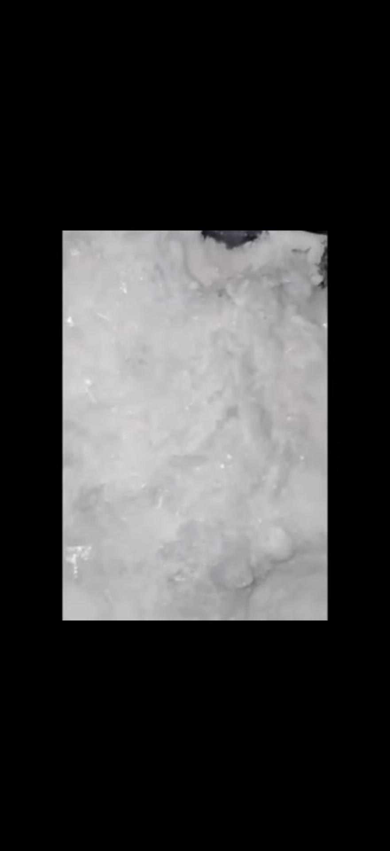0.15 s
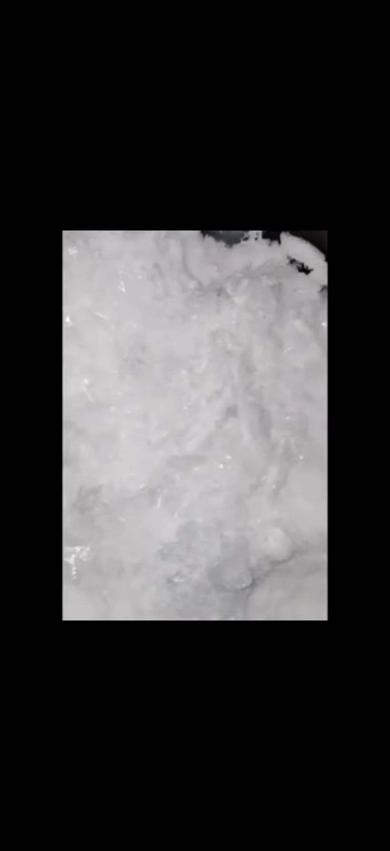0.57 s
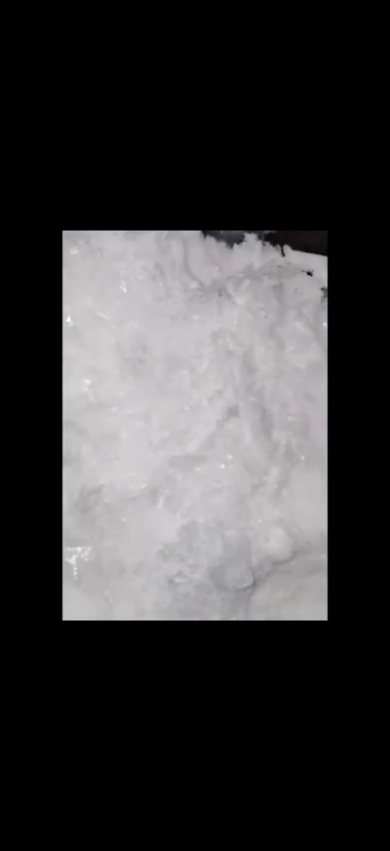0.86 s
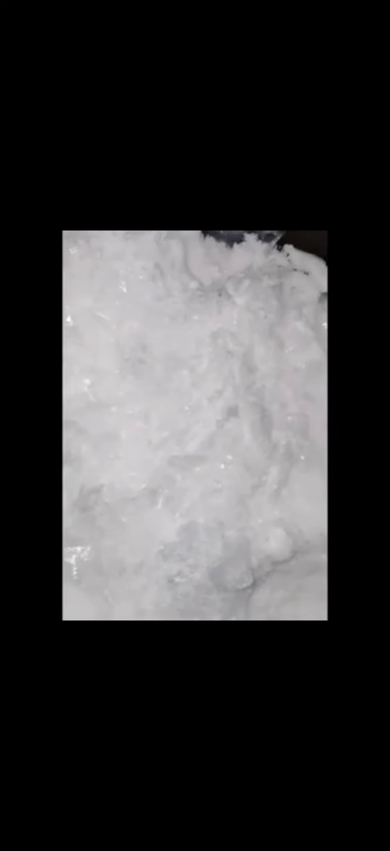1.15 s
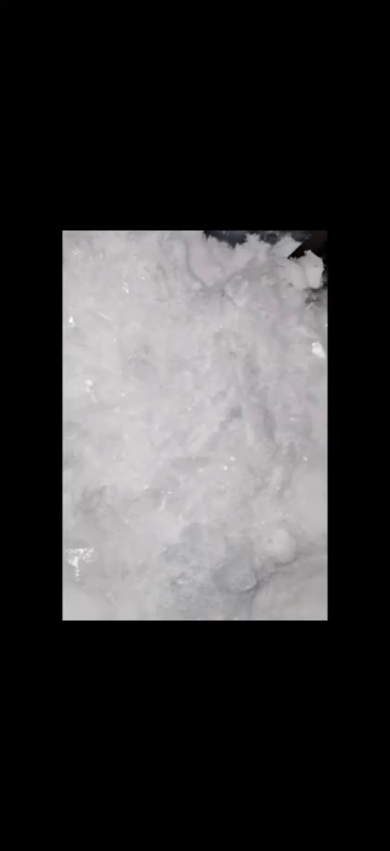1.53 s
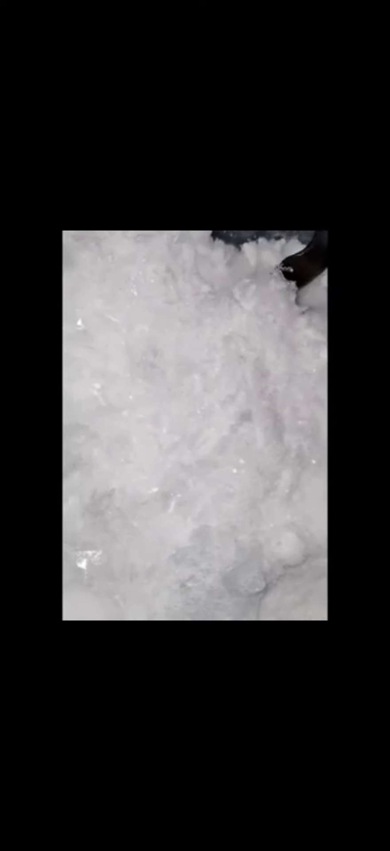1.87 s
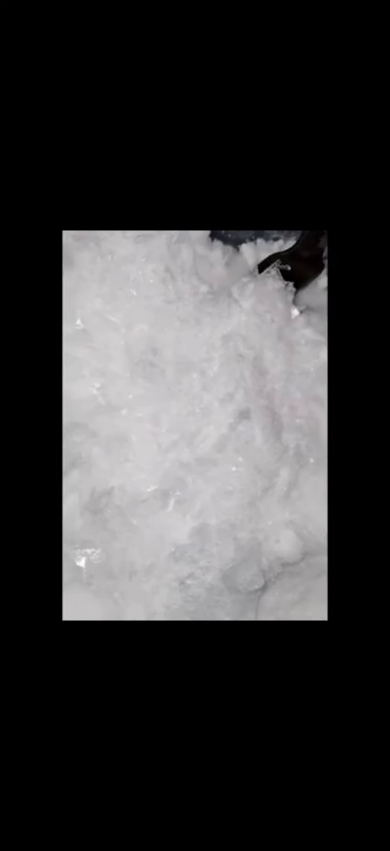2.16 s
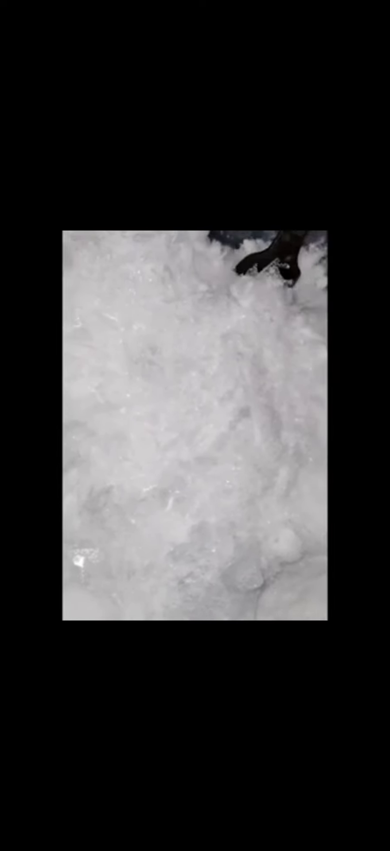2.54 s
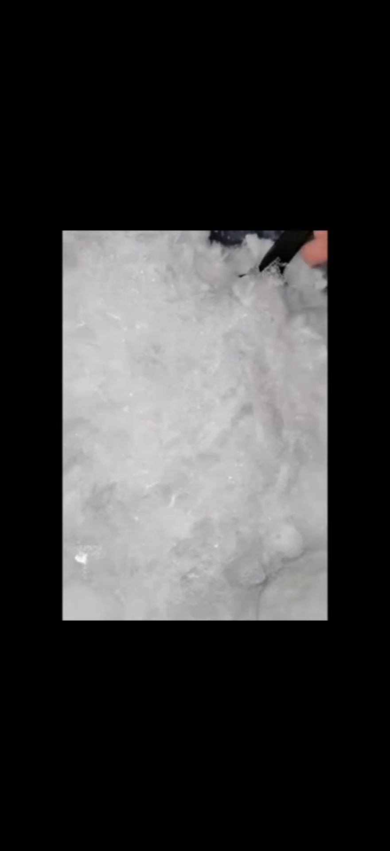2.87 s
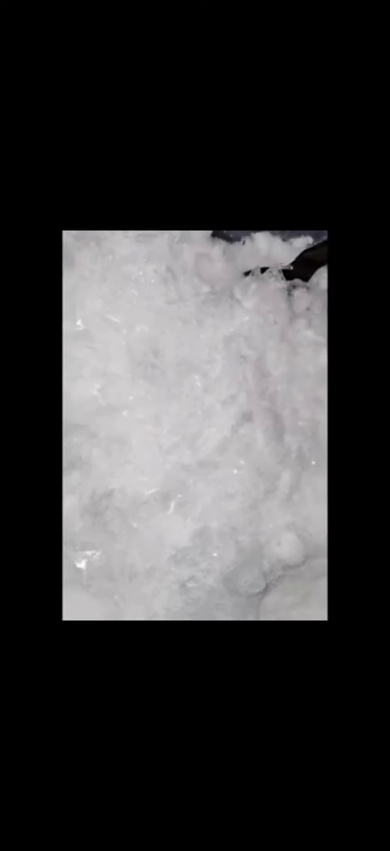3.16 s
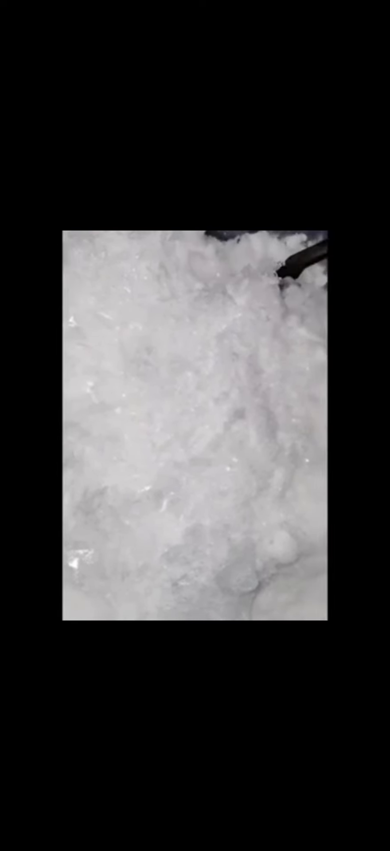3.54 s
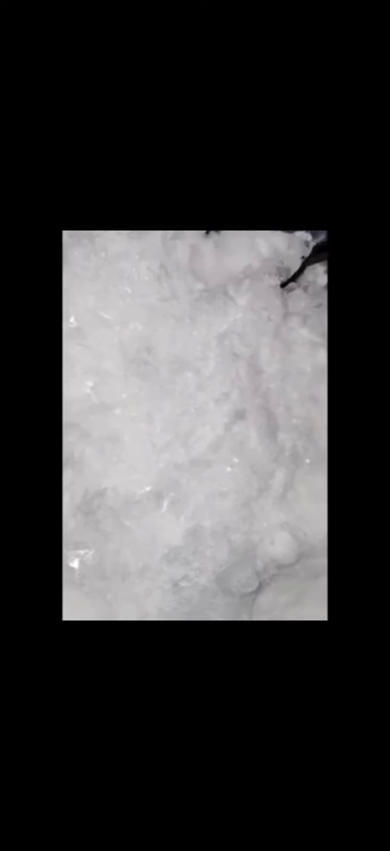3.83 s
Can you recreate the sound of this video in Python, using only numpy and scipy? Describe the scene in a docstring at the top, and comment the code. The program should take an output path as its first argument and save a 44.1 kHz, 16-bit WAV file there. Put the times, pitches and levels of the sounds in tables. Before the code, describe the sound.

Close, gritty scraping of frost inside a freezer comes in quick, uneven strokes as a blade catches and slips. Small ice cracks and a few dull knocks punctuate it, with a tight echo and faint hum behind.

```python
"""Short, fizzing scrapes, right up close: a hand tool working through thick frost in a freezer.
Each stroke crushes fine crystals for the bright top and coarse grit for the crunch, which rings the
blade and the icy crust. Bits of ice snap off, the edge sticks and slips in rasps, and the wall thuds
under the push. The compartment adds a tight echo; a faint compressor hum and room tone sit underneath."""
import sys
import numpy as np
from scipy import signal
from scipy.fft import rfft, irfft
from scipy.io import wavfile
from scipy.ndimage import map_coordinates

SR = 44100
rng = np.random.default_rng(int(sys.argv[2]) if len(sys.argv) > 2 else 0)


def store_pcm(level_fs):
    """Save levels as 16-bit WAV."""
    pcm = np.round(np.clip(level_fs, -1, 1) * 32767).astype(np.int16)
    wavfile.write(sys.argv[1], SR, np.atleast_2d(pcm).T)


N = 176400

# blade strokes: t/s, attack/s, length/s, crystal level/dB, grit level/dB (both before their trims)
STROKES = [(0.077, 0.037, 0.28, -44.5, -40), (0.186, 0.038, 0.071, -33, -34),
           (0.268, 0.043, 0.079, -31, -40), (0.355, 0.018, 0.083, -28, -37), (0.435, 0.06, 0.1, -31, -27.5),
           (0.556, 0.027, 0.059, -26.5, -32), (0.626, 0.018, 0.027, -33, -35),
           (.68, 0.0028, 0.011, -23.5, -32), (0.775, 0.071, 0.076, -22, -37.5),
           (0.958, 0.049, 0.31, -36, -39), (1.21, 0.049, 0.058, -30, -28.5),
           (1.302, 0.0046, 0.01, -34, -29.5), (1.362, 0.006, 0.17, -33.5, -36),
           (1.547, 0.05, 0.093, -27, -29), (1.708, 0.01, 0.028, -24.5, -26.5),
           (1.745, .006, 0.016, -27.5, -28.5), (1.847, 0.0078, 0.016, -22, -25.5),
           (1.911, 0.004, 0.013, -24, -24.5), (1.955, 0.0037, 0.038, -28, -27.5),
           (1.996, .003, 0.29, -39, -36), (2.054, .005, 0.098, -30, -29.5),
           (2.171, 0.041, 0.068, -25, -25.5), (2.296, 0.0048, 0.035, -27.5, -26.5),
           (2.346, 0.0026, 0.0093, -30, -29), (2.546, 0.012, 0.058, -28, -33.5),
           (2.588, 0.017, 0.078, -34.5, -28.5), (2.663, .01, 0.14, -55.5, -44),
           (2.795, 0.042, 0.17, -44, -39.5), (2.916, 0.053, 0.087, -30, -28.5),
           (3.002, 0.0043, 0.14, -38, -43), (3.151, 0.073, 0.13, -34.5, -27.5),
           (3.299, 0.039, 0.068, -42.5, -28), (3.383, 0.0063, 0.029, -37.5, -30),
           (3.414, 0.022, 0.1, -33, -26), (3.688, 0.07, 0.44, -40.5, -45)]
# ice snapping off: t/s, crystal level/dB, blade ring level/dB
SNAPS = [(0.471, -26, -23), (1.119, -41, -27.5), (1.368, -19.5, -24), (0.564, -25, -32),
         (1.566, -26.5, -38), (2.555, -16.5, -20.5), (3.189, -24, -28), (3.36, -35, -28),
         (3.75, -21, -25.5), (3.885, -28.5, -23.5), (3.974, -25.5, -48)]
# gliding rasps of the edge: t/s, length/s, start f/Hz, end f/Hz, width/Hz, level/dB
RASPS = [(0.087, 0.042, 2200, 2110, 110, -37.5), (0.821, .095, 1730, 1360, 330, -37),
         (.99, 0.13, 1710, 1400, 413, -37), (1.122, 0.17, 1280, 1050, 257, -36.5),
         (3.39, 0.019, 2240, 1810, 300, -24), (3.458, 0.047, 1370, 1140, 450, -29.5),
         (3.9, 0.12, 3460, 3080, 130, -43), (3.969, 0.029, 1057, 1110, 50, -30)]
# pushes that shake the wall: t/s, length/s, level/dB
THUDS = [(0.462, 0.015, -22), (0.494, 0.055, -29), (1.938, 0.2, -37.5), (2.547, 0.0056, -23.5),
         (2.928, 0.27, -41.5)]
# resonances: f/Hz, width/Hz, relative level/dB
SKIM_MODES = [(1301, 154, 2), (2196, 214, 3), (2947, 270, 2), (5000, 470, -5.5)]  # blade and crust, skimming
DUG_MODES = [(1330, 124, 3.5), (2046, 230, 2.5), (2455, 210, 2.5), (3050, 180, -23), (3610, 240, -5)]  # blade and crust, dug in
BLADE_MODES = [(1310, 160, 1.5), (2120, 270, -15), (3080, 370, 3.5), (5240, 240, -2.5)]  # blade rung by a snap
WALL_MODES = [(113, 12.4, -6), (166, 45, -17.5), (245, 30, -2), (335, 32, -11)]  # freezer wall
# tone curves: f/Hz, relative level/dB
CRYSTAL_EQ = [(300, -8.5), (1500, -20.5), (3000, -3), (5200, -1.5), (8500, -3.5), (11500, 4), (15000, 1.5),
              (16000, -6.5)]  # fine crystals breaking
GRIT_EQ = [(40, -35), (130, -14), (280, -4), (500, -4), (850, -18.5), (1300, -16.5), (3200, -10.5),
           (6000, -16), (16000, -64)]  # coarse grit breaking
ROOM_EQ = [(20, -15), (48, 1.5), (70, -6.5), (110, 2.5), (170, -5.5), (270, -0.5), (450, -9), (800, -12),
           (3000, -20), (8000, -35.5)]  # room tone
# compressor hum partials: f/Hz, level/dB
HUM_PARTIALS = [(48.4, -51), (144.8, -53)]

TIME = np.arange(N) / SR
BIN_HZ = np.arange(N // 2 + 1) * SR / N + 1  # 1 Hz up, to stay clear of zero
FINE_PER_S, COARSE_PER_S = 9000, 2600  # grain densities


def frost(fizz_trim_db=0.5, crunch_trim_db=-0.5, dig_start_s=2.31, dig_end_s=3.19):
    """The blade catches and slips: crystals fizz, and grit rings the blade and the crust."""
    fine, coarse = stroke_envelopes()
    slip = wander(per_s=260)
    crystals = fine * unit_rms(undb(2.4 * slip)) * grains(FINE_PER_S, spread_db=4.5)
    judder = unit_rms(undb(1.1 * slip + 2.55 * wander(per_s=160)))
    grit = coarse * judder * grains(COARSE_PER_S, spread_db=4.0)
    # the ring crossfades from skimming to dug in as the blade sinks
    depth = np.clip((TIME - dig_start_s) / (dig_end_s - dig_start_s), 0, 1)
    crunch = 0
    for share, modes in ((1 - depth, SKIM_MODES), (depth, DUG_MODES)):
        tone = np.hypot(resonances(modes), eq_curve(GRIT_EQ))
        crunch += colour(grit * np.sqrt(share), tone)
    fizz = colour(crystals, eq_curve(CRYSTAL_EQ))
    return undb(fizz_trim_db) * fizz + undb(crunch_trim_db) * blade_hollow(crunch)


def stroke_envelopes(sag_db=6.5, dust_db=-16.5, crumbs_db=-8):
    """Fine and coarse breaking: a stroke sags as the frost yields, stops fast, trails dust and crumbs."""
    fine_power, coarse_power = np.zeros(N), np.zeros(N)
    for start, attack, length, fine_db, coarse_db in STROKES:
        push = envelope(start, attack, length, release_s=0.0057, sag_db=sag_db)
        dust = undb(dust_db) * envelope(start, attack, length, release_s=0.037, sag_db=sag_db)
        crumbs = undb(crumbs_db) * envelope(start, attack, length, release_s=0.034, sag_db=sag_db)
        fine_power += (undb(fine_db) * np.maximum(push, dust)) ** 2
        coarse_power += (undb(coarse_db) * np.maximum(push, crumbs)) ** 2
    return np.sqrt(fine_power), np.sqrt(coarse_power)


def blade_hollow(crunch, delay_s=0.001097, drift=0.19, echo_db=-9):
    """The gap under the blade changes size, so its echo flanges the crunch."""
    lag = delay_s * SR * np.exp(drift * wander(per_s=7))
    return crunch + undb(echo_db) * map_coordinates(crunch, [np.arange(N) - lag], order=3)


def ice_snaps():
    """A bit of ice gives way: a spray of crystals and a short ring of the blade."""
    spray, knock = np.zeros(N), np.zeros(N)
    for start, crystal_db, ring_db in SNAPS:
        crack = envelope(start, attack_s=0.0004, length_s=0.001, release_s=0.0046)
        spray += undb(crystal_db) * crack
        knock += undb(ring_db) * crack
    sparkle = colour(spray * rng.standard_normal(N), eq_curve(CRYSTAL_EQ))
    ring = colour(knock * rng.standard_normal(N), resonances(BLADE_MODES))
    return sparkle + ring


def edge_rasps(pitch_wobble=0.053):
    """Stick-slip clicks ring a gliding resonance: a rub when wide, a squeak when narrow."""
    clicks = grains(COARSE_PER_S, spread_db=3)
    wobble = np.exp(pitch_wobble * wander(per_s=150))
    rasps = np.zeros(N)
    for start, length, from_hz, to_hz, width_hz, db in RASPS:
        pitch_hz = wobble * np.interp(TIME, [start, start + length], [from_hz, to_hz])
        carrier = np.exp(2j * np.pi * np.cumsum(pitch_hz) / SR)
        pole = np.exp(-np.pi * width_hz / SR)
        # shift down, low-pass, shift back: a band-pass that rides the pitch
        ring = (carrier * signal.lfilter([1], [1, -pole], clicks / carrier)).real
        gate = envelope(start, attack_s=0.0069, length_s=length, release_s=0.0057)
        rasps += undb(db) * unit_rms(ring) * gate
    return rasps


def wall_thuds(lowpass_hz=600):
    """The freezer wall booms as the tool judders against it."""
    push = sum(undb(db) * envelope(start, attack_s=0.0057, length_s=length, release_s=0.0098)
               for start, length, db in THUDS)
    boom = colour(push * grains(COARSE_PER_S, spread_db=1), resonances(WALL_MODES))
    return signal.sosfilt(signal.butter(2, lowpass_hz, fs=SR, output="sos"), boom)


def compartment_echo(close, t60_s=0.12, predelay_s=0.0015, wet_db=-10.5):
    """The frosted compartment throws back a tight, dense tail."""
    t = np.arange(SR // 4) / SR
    tail = rng.standard_normal(len(t)) * np.exp(-np.log(1000) * t / t60_s) * (t > predelay_s)
    tail /= np.sqrt(np.sum(tail ** 2))
    return undb(wet_db) * signal.fftconvolve(close, tail)[:N]


def freezer_bed(room_db=-44):
    """Compressor hum over a low, dull room tone."""
    hum = np.zeros(N)
    for hz, db in HUM_PARTIALS:
        level = undb(db + 0.3 * wander(per_s=6.8))
        hum += level * np.sqrt(2) * np.sin(2 * np.pi * (hz * TIME + rng.random()))
    return hum + undb(room_db) * colour(rng.standard_normal(N), eq_curve(ROOM_EQ))


def grains(per_s, spread_db):
    """Tiny random fractures of scattered size, rms 1."""
    hits = rng.random(N) < per_s / SR
    polarity = np.sign(rng.standard_normal(N))
    size = undb(spread_db * np.clip(rng.standard_normal(N), -2, 2))
    return unit_rms(hits * polarity * size)


def envelope(start_s, attack_s, length_s, release_s, sag_db=0):
    """Linear attack, a hold that can sag, exponential release."""
    t = TIME - start_s
    sag = undb(-sag_db * (np.clip(t / length_s, 0, 1) - .5))
    release = np.exp(-np.clip((t - length_s) / release_s, 0, 20))
    return np.clip(t / attack_s, 0, 1) * sag * release


def wander(per_s):
    """Smooth random modulation, spread near 1."""
    return np.interp(TIME * per_s, np.arange(N), rng.standard_normal(N))


def eq_curve(points):
    """Gain per frequency through the points of a tone curve."""
    hz, db = np.array(points, float).T
    return undb(np.interp(np.log(BIN_HZ), np.log(hz), db))


def resonances(modes):
    """Gain per frequency of a bank of ringing modes."""
    return np.sqrt(sum(undb(db) ** 2 / (1 + ((BIN_HZ ** 2 - hz ** 2) / (BIN_HZ * width)) ** 2)
                       for hz, width, db in modes))


def colour(x, gain):
    """Minimum-phase EQ that keeps the power of white noise."""
    cepstrum = irfft(np.log(unit_rms(gain) + 1e-6), N)
    cepstrum[1:N // 2] *= 2
    cepstrum[N // 2 + 1:] = 0
    impulse = irfft(np.exp(rfft(cepstrum)), N)[:N // 20]
    return signal.fftconvolve(x, impulse)[:N]


def undb(db):
    """Decibels to gain."""
    return 10 ** (np.asarray(db) / 20)


def unit_rms(x):
    """Scale to rms 1."""
    return x / np.sqrt(np.mean(x ** 2))


def scene():
    """Mono mix: the scraping up front, its short echo behind, the hum underneath."""
    close = frost() + ice_snaps() + edge_rasps() + wall_thuds()
    return (close + compartment_echo(close) + freezer_bed())[None]


def record(dry):
    """The microphone port notches the treble, and a steep low-pass takes off the very top."""
    notch_hz, notch_q, notch_db, top_hz = 7880, 8.5, -9, 15750
    notched = signal.lfilter(*signal.iirnotch(notch_hz, notch_q, fs=SR), dry)
    heard = notched + undb(notch_db) * (dry - notched)
    return signal.sosfilt(signal.ellip(10, .2, 80, top_hz, fs=SR, output="sos"), heard)


dry = scene()
out = record(dry)
store_pcm(out)
```